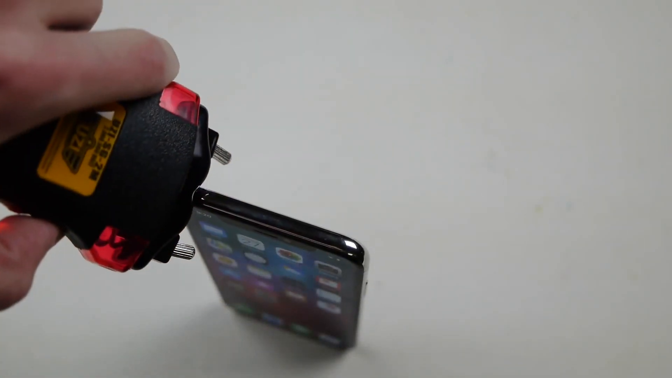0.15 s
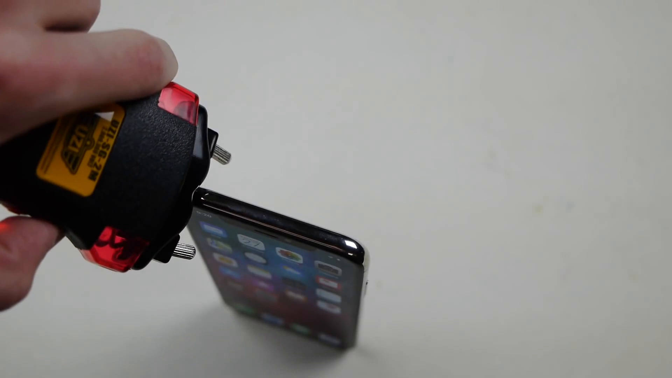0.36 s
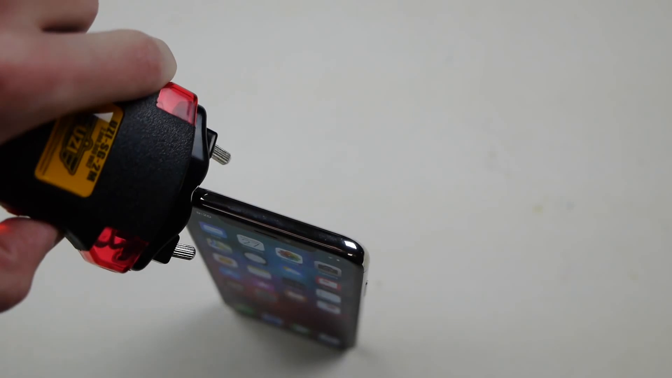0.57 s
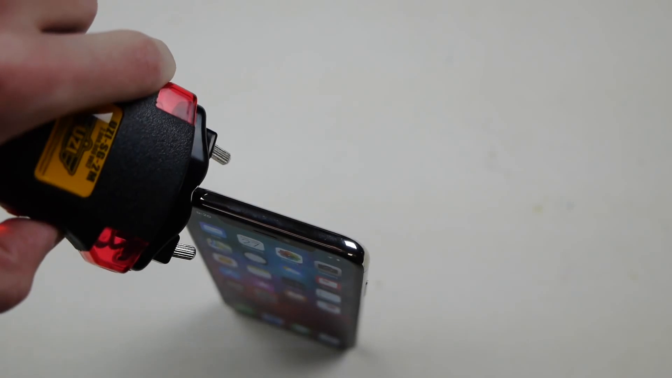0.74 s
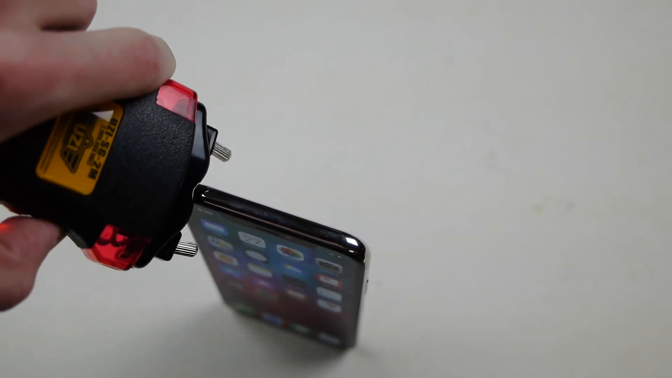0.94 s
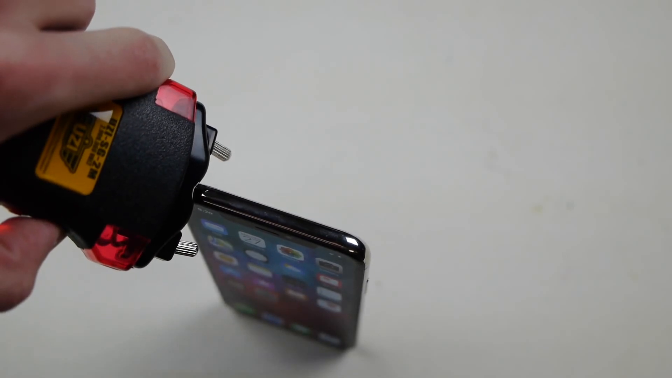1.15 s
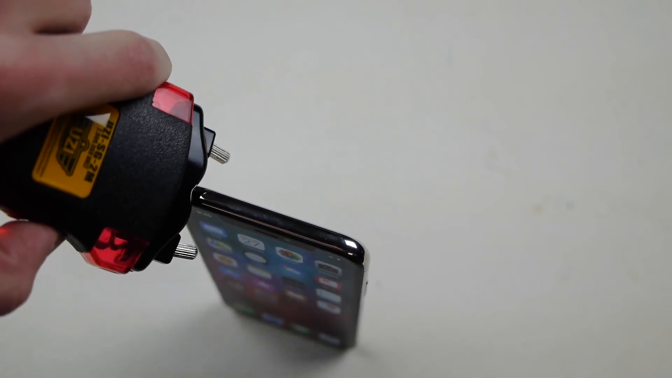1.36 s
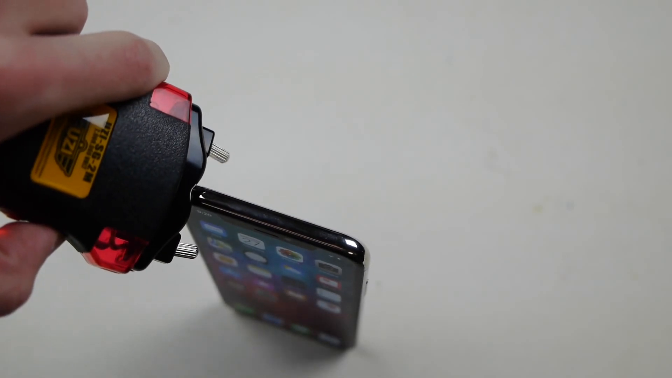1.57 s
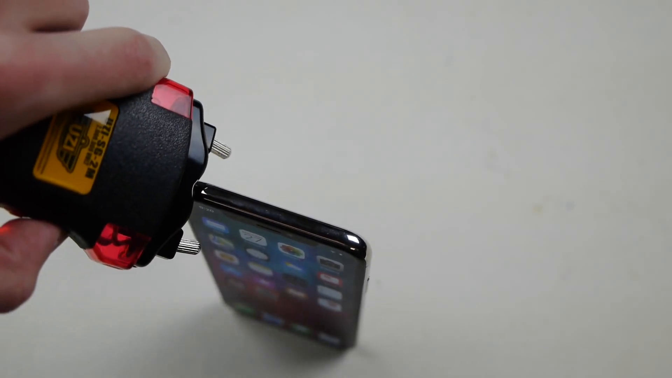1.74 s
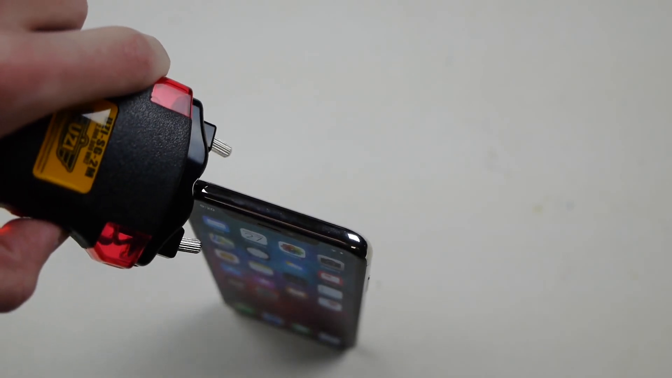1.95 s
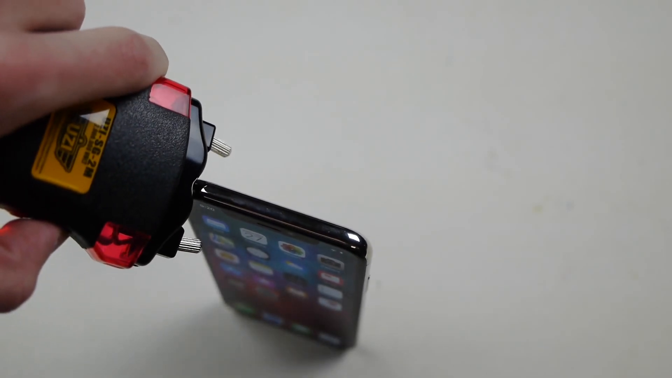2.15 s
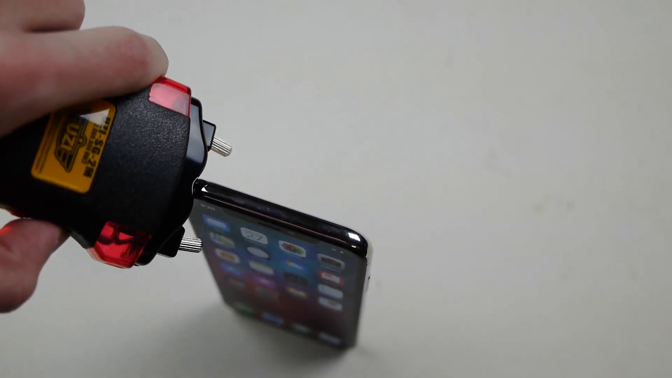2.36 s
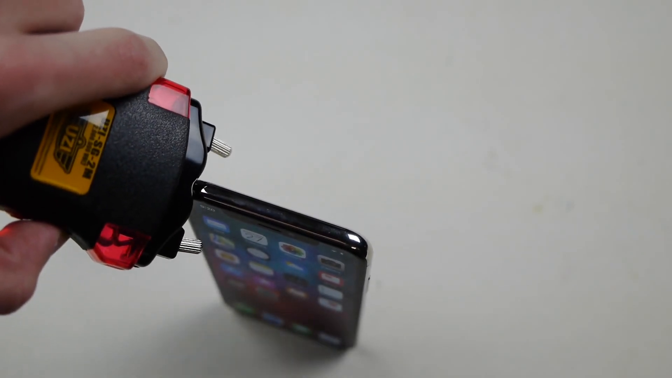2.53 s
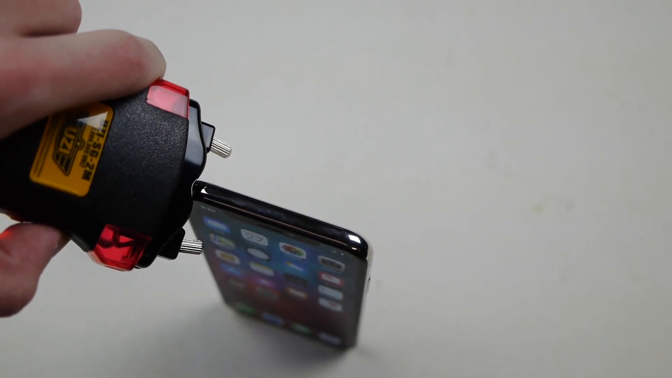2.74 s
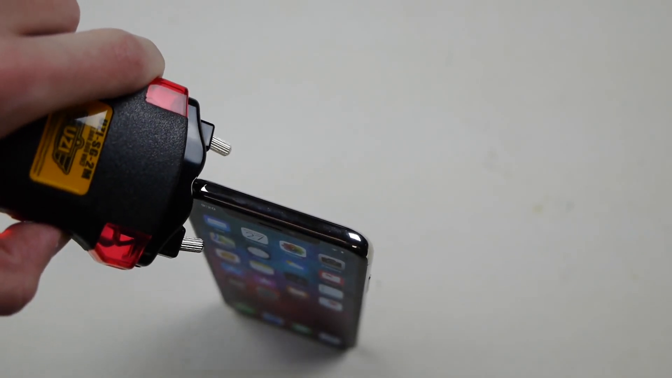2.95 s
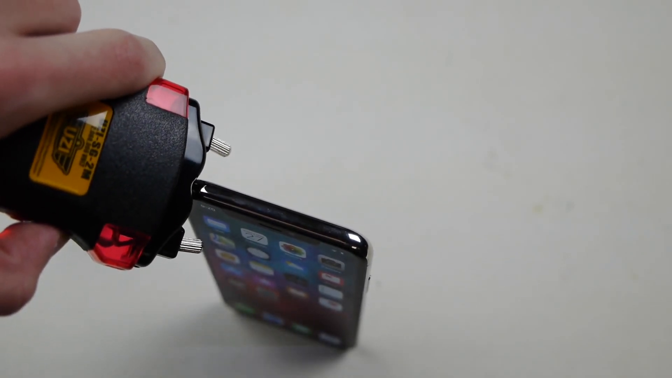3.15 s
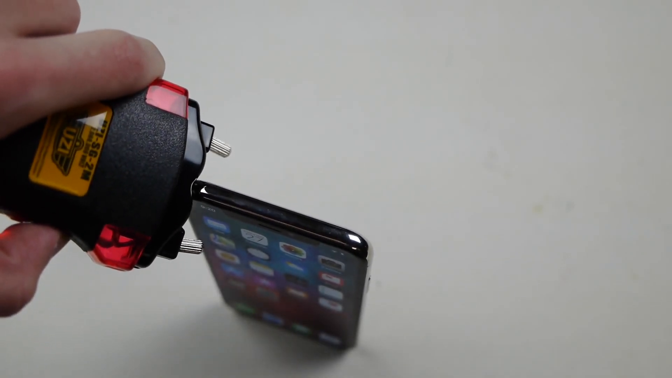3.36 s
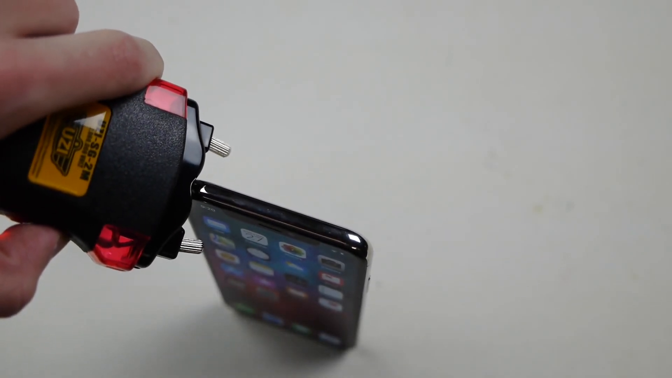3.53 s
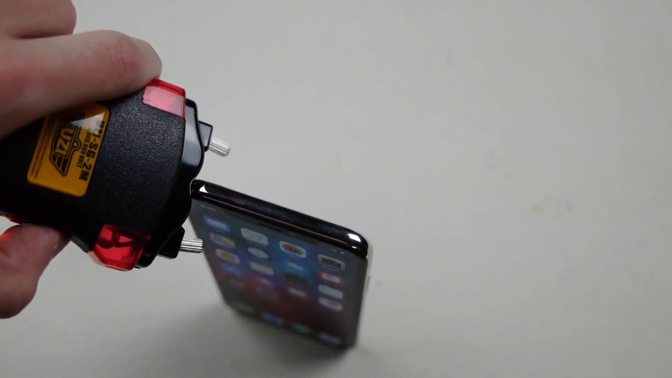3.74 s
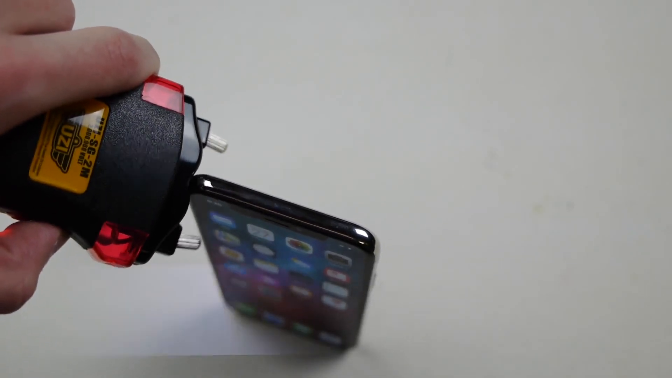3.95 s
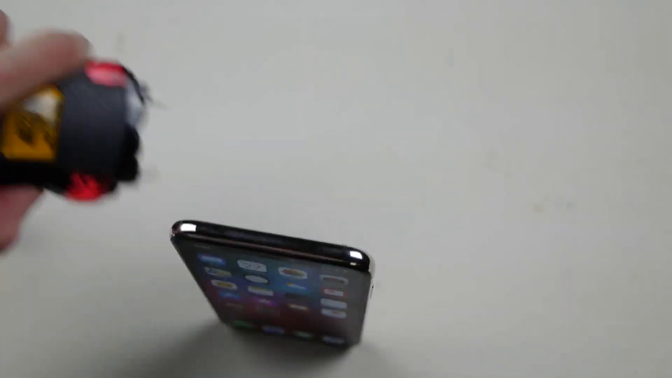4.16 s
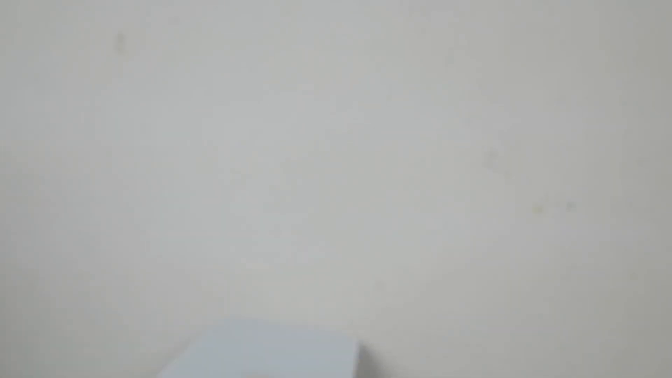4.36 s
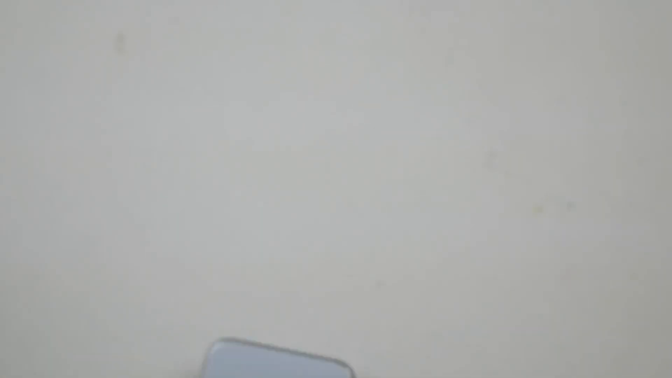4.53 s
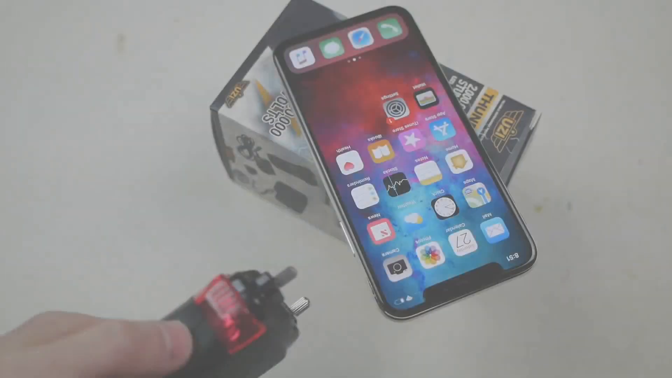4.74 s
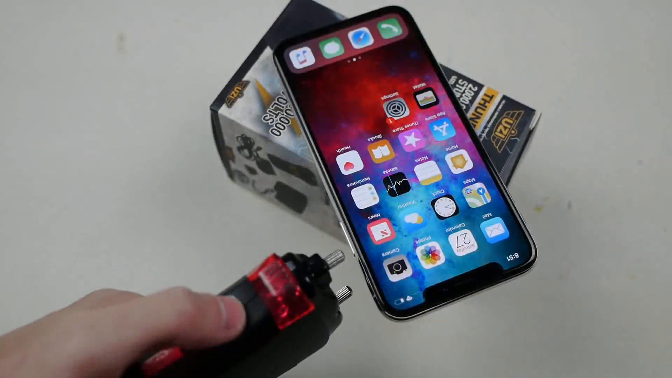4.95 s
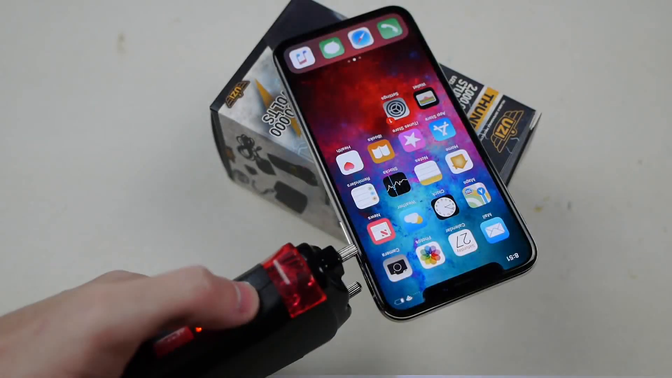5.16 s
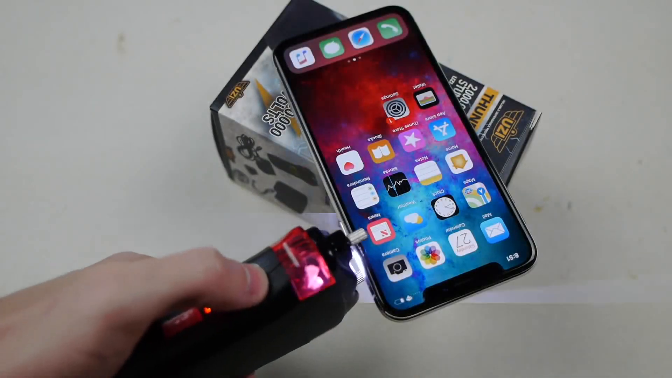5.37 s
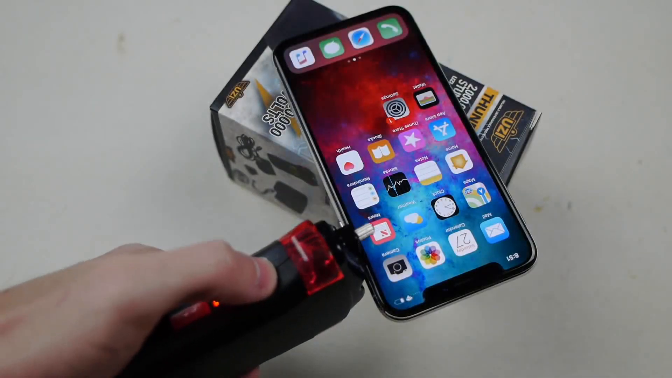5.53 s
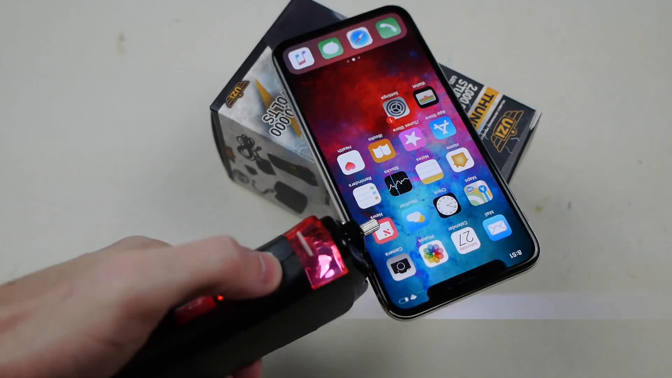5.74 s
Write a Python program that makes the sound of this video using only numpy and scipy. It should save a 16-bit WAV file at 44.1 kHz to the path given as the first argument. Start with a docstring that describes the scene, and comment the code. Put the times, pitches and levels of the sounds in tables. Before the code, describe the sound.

A stun gun crackles in a fast buzz, a phone topples onto a table, then slower, louder sparks follow.

```python
"""A stun gun sparks against a phone on a table, close to two microphones in a bare, bright room. Each spark is
one pressure spike as the gap breaks down; the short gap gives a fast, uneven buzz. The gun is drawn off, the
gap grows and the sparks come slower and harder; a hollow knock rings with the last of these, then the phone
slaps down and sets the table ringing. The trigger clicks and a slow, loud string of sparks follows. Quiet room
air lies behind it all, and the recorder softly clips the tallest spikes."""
import sys
import numpy as np
from scipy import signal
from scipy.fft import rfft, irfft
from scipy.io import wavfile
from scipy.ndimage import uniform_filter1d, map_coordinates

SR = 44100
rng = np.random.default_rng(int(sys.argv[2]) if len(sys.argv) > 2 else 0)


def persist_wave(psi):
    """Save psi, clipped to +-1, as 16-bit WAV."""
    counts = np.round(np.clip(psi, -1, 1) * 32767).astype(np.int16)
    wavfile.write(sys.argv[1], SR, np.atleast_2d(counts).T)


N = 255770

SIZE_EXPONENT = 0.84  # a slower pace means a wider gap: spark size goes with the mean wait to this power
FLUTTER_DB, FLICKER_DB = .45, .6  # depth of the buzz's wavering in strength and in brightness
CREEP_MS, CREEP_RATE = .018, 18  # the arc's foot creeps along the metal: path shift, moves a second
PATH_SPREAD_DB = .8  # spread of each path's strength from spark to spark
TOP_HZ = 15900  # the recorder's band limit

# Pace across the short gap. Each row: time in seconds, sparks per second.
BUZZ_PACE = [(0, 59), (.2, 68), (.3, 61), (.39, 66), (.5, 58.5), (.95, 60), (1.5, 56), (1.85, 58.5),
             (2.18, 58), (2.28, 71), (2.4, 60), (2.75, 56), (3.08, 60), (3.18, 54), (3.5, 56), (3.8, 52.5),
             (4.012, 53)]
# Sparks across a wide gap. Each row: start in seconds, crack and low pop levels in relative dB.
SLOW_SPARKS = [(4.0287, -1.5, -12), (4.0523, 2, -2.5), (4.0783, 1.5, 2), (4.1028, 2, 1.5), (4.13, 3.5, 10),
               (4.1551, 3, -5), (4.1837, 2.5, -16), (4.2078, 0.5, -16), (4.238, -1.5, 2), (5.211, 2, 15.5),
               (5.2385, -2, 6.5), (5.27, -3, 8), (5.2962, -1.5, -2.5), (5.3258, 1.5, 4.5),
               (5.3542, -0.5, 8.5), (5.382, -1.5, 6.5), (5.409, -3.5, -7), (5.439, -0.5, 9.5),
               (5.4676, 0.5, -2), (5.4976, -3, 6), (5.5251, 0, -20), (5.5546, -0.5, -20), (5.5869, 0, -19),
               (5.6217, 1, -20), (5.6557, -0.5, -18), (5.6902, 1.5, -26), (5.7224, -1.5, -29),
               (5.7485, -1, -25), (5.7821, -2, -31)]
# Spectra of the cracks and low pops. Each row: frequency in Hz, level in relative dB.
BUZZ_COLOUR = [(30, -21), (60, -16.5), (115, -11.5), (165, -12), (205, -13), (300, -14), (400, -10.4),
               (500, -11.5), (600, -14), (780, -11), (1130, -15.5), (1450, -18), (2100, -10.5),
               (2600, -14.5), (3000, -13.5), (3300, -14.5), (3600, -7.5), (4100, -9), (4450, -11),
               (4900, -7.5), (5500, -10), (7000, -7.5), (8200, -7), (9000, -5), (10300, -3), (11200, -4.5),
               (11850, -2), (12450, -2.5), (13400, 0.5), (14500, 1.2)]
WIDENING_COLOUR = [(40, -22), (400, -5), (1600, -10.5), (2500, -8), (4500, -4), (6500, -2), (10000, 0.5),
                   (13500, 2.5), (16000, 4.5)]
LONG_COLOUR = [(30, -61), (110, -48), (250, -16), (480, -5.5), (700, -5), (1100, -7.5), (1650, -13.5),
               (2200, -12.5), (2850, -4), (3500, -5), (4400, -6.3), (5800, -4), (7100, -1.5), (8000, -3),
               (9000, -1), (10500, -3), (13000, 0.7), (16000, -4)]
WIDENING_POP_COLOUR = [(25, -23), (75, -2.5), (140, 2.7), (250, 2.5), (450, 2.5), (750, -6.5), (1100, -16),
                       (1600, -22), (2700, -13), (4000, -34.5)]
LONG_POP_COLOUR = [(25, -23), (70, -4.5), (170, 0.5), (400, 0), (700, -8.5), (1500, -11.5), (2800, -11),
                   (4000, -31.5)]
# The gun's casing and prongs, ringing faintly. Each row: frequency in Hz, level in relative dB.
CASING_MODES = [(3720, -56), (4030, -54), (5026, -54), (8813, -50), (10126, -49), (10255, -49),
                (10487, -47), (11800, -47), (12909, -50), (13404, -50), (14104, -48), (14690, -48),
                (15224, -50)]
# Resonances around the prongs beside the phone. Each row: frequency in Hz, relative dB, t60 in seconds.
PRONG_MODES = [(2710, -4, 0.011), (2980, -6, 0.013), (7080, -0.5, 0.013), (8900, -5.5, 0.019)]
# Paths to the microphones, direct and off the table and nearby surfaces, with the phone upright and
# with the gun low. Small surfaces return only treble, soft ones only bass. Each row: delay in ms,
# lag at the right microphone in ms, gain in dB, low and high corners in Hz.
UPRIGHT_PATHS = [(0, .018, 1.3, 32, 14000), (.75, .02, -2, 2000, 16000), (2.52, .16, -3, 34, 1900),
                 (3.31, .34, -2, 3500, 17000), (3.66, -.33, -7, 5000, 18000), (6.05, .75, -8, 1200, 4000),
                 (8.5, .08, -10, 1500, 21000), (13.85, .2, -7, 1600, 19000)]
LOW_PATHS = [(0, 0, -.5, 1800, 12000), (.47, .015, 8.2, 150, 10000), (1.02, -.25, 1, 2500, 16000),
             (2.77, .2, -2, 2500, 18000), (3.16, .1, 0, 3000, 18000), (5.3, .1, -6, 2000, 18000),
             (13.4, .2, -8, 1600, 19000)]

# A hollow knock that rings with the last spark of the widening arc, and the table under it. Each row: frequency
# in Hz, level in relative dB, t60 in seconds.
KNOCK_MODES = [(319, -14, 0.068), (428, -18, 0.1), (704, 2, 0.039), (746, -9, 0.058)]
TABLE_MODES = [(118, 4.5, 0.19), (214, -7, 0.093), (332, -4, .12), (460, 1, .13), (538, -3, .15),
               (610, -12, .14)]
# The phone falls flat and settles. Each row: start in seconds, slap and table ring in relative dB.
LANDINGS = [(4.5986, -29, -37), (4.623, -47, -41), (4.691, -50, -45.5), (4.853, -90, -66)]
# Thuds as its far end comes down and as it comes to rest.
# Each row: start in seconds, level in dB, frequency in Hz, t60 in seconds.
THUDS = [(4.6225, -11, 170, .03), (4.855, -32, 150, .07)]
# Clicks of the grip and trigger. Each row: start in seconds, level in relative dB.
CLICKS = [(4.94, -58), (5.1865, -34.5)]
# Spectra of the phone's slap, its dull rattle and the clicks. Each row: frequency in Hz, relative dB.
SLAP_COLOUR = [(30, -22), (90, -10), (250, 3), (370, -3.5), (520, 5.5), (700, -2), (900, -3.5), (1800, -6),
               (4000, -12), (7000, -16.5), (10000, -24.5), (15000, -38)]
RATTLE_COLOUR = [(40, -42.5), (120, -1), (200, -4), (330, -5.5), (450, 2), (620, -7), (900, -9),
                 (3000, -46)]
CLICK_COLOUR = [(100, -19), (750, 14), (1500, -2), (4500, 0.5), (8000, -8), (15000, -18)]

# The bare room's decay. Each row: frequency in Hz, t60 in seconds.
ROOM_T60 = [(150, 0.04), (500, 0.38), (2500, 0.6), (5500, 0.48), (8000, 0.45), (11000, 0.36), (16000, 0.32)]
# Spectra of its reverberation and its air. Each row: frequency in Hz, level in relative dB.
ROOM_COLOUR = [(100, -6), (400, -16.5), (1200, -9), (2200, -3.5), (3600, -1.5), (7000, 1), (11000, -1),
               (15000, -7)]
AIR_COLOUR = [(15, -58), (25, -36.5), (114, -11.5), (451, -14.5), (516, -14), (796, -25.5), (1040, -22),
              (1130, -25), (11600, -34), (16000, -45.5)]
# The air sinks and comes back up. Each row: time in seconds, level in relative dB.
AIR_LEVEL = [(0, -60), (4.3, -71.5), (4.82, -79), (4.92, -67.5), (5.8, -56)]
# A faint background hum. Each row: frequency in Hz, level in dB.
HUM_TONES = [(113, -70), (317.6, -72), (522.2, -70), (1044, -79)]


def buzz(level_db=-3.0, jitter=.16):
    """Small, fast sparks across the short gap waver in strength and brightness; the casing rings along."""
    times, sizes = firing(BUZZ_PACE, jitter)
    sizes = sizes * amp(level_db)
    casing = sum(amp(db + 25) * ringing(hz, t60=.06) for hz, db in CASING_MODES)
    cracks = sparks(times, sizes, BUZZ_COLOUR, UPRIGHT_PATHS,
                    scatter_db=3.0, scatter_t60=0.026, room_db=6.0, wander=0.68)
    treble = band(cracks, low_hz=6000, high_hz=20000)
    flutter = amp(FLUTTER_DB * wobble(rate=13))
    flicker = amp(FLICKER_DB * wobble(rate=18)) - 1
    return flutter * (cracks + flicker * treble) + convolve(impulses(times, sizes), casing)


def widening_arc(level_db=2.5):
    """The gun is drawn away: fewer, harder sparks, weaker at the end as the arc stretches and breaks."""
    times, crack_db, pop_db = slow_sparks(start_s=4, stop_s=5)
    cracks = sparks(times, amp(level_db + crack_db), WIDENING_COLOUR, UPRIGHT_PATHS,
                    scatter_db=2.0, scatter_t60=0.02, room_db=7, wander=0.69)
    lows = pops(times, pop_db, WIDENING_POP_COLOUR,
                room_db=-5, rumble_db=-7.5, rumble_t60=0.1, rumble_hz=450)
    return cracks + lows


def long_arc(level_db=3.0):
    """A slow, loud string of sparks close to the table; the first is the hardest."""
    times, crack_db, pop_db = slow_sparks(start_s=5, stop_s=6)
    sizes = amp(level_db + crack_db)
    cracks = sparks(times, sizes, LONG_COLOUR, LOW_PATHS,
                    scatter_db=6.0, scatter_t60=0.014, room_db=8.5, wander=0.78)
    prongs = sum(amp(db) * ringing(hz, t60) for hz, db, t60 in PRONG_MODES)
    ring = band(convolve(impulses(times, sizes), prongs), low_hz=800, high_hz=20000)
    lows = pops(times, pop_db, LONG_POP_COLOUR,
                room_db=-9, rumble_db=-9.5, rumble_t60=0.093, rumble_hz=302)
    return cracks + ring + lows


def firing(pace, jitter):
    """Spark times and sizes: the capacitor charges until breakdown; a longer wait stores more energy."""
    knots, rate = np.transpose(pace)
    t = np.arange(knots[0], knots[-1], 1 / SR)
    charge = np.cumsum(np.interp(t, knots, rate)) / SR
    waits = 1 + jitter * rng.uniform(-1, 1, int(charge[-1]) + 1)
    due = np.cumsum(waits)
    due -= uniform_filter1d(due - np.arange(len(due)), size=9)  # the mean pace follows the charging rate
    times = np.interp(due, charge, t)
    rates = np.interp(times, knots, rate)
    return times, np.sqrt(waits) * (rates.mean() / rates) ** SIZE_EXPONENT


def slow_sparks(start_s, stop_s):
    """Times, crack levels and pop levels of the wide-gap sparks in one stretch."""
    return np.transpose([row for row in SLOW_SPARKS if start_s < row[0] < stop_s])


def sparks(times, sizes, colour, paths, scatter_db, scatter_t60, room_db, wander, routes=4):
    """Each pressure spike reaches the microphones directly, off nearby surfaces and from the room."""
    near = np.zeros((2, N))
    onsets = np.clip(times * SR, 0, N - 1).astype(int)
    for delay_ms, lag_ms, db, low_hz, high_hz in paths:
        path_ms = delay_ms + CREEP_MS * wobble(CREEP_RATE)[onsets]
        strength = sizes * amp(db + PATH_SPREAD_DB * rng.standard_normal(len(times)))
        arrivals = [impulses(times + ms / 1000, strength) for ms in (path_ms, path_ms + lag_ms)]
        near -= band(arrivals, low_hz, high_hz)
    # the gun, hand and phone scatter the upper part of the spike
    near += amp(scatter_db) * band(bursts(times, sizes, scatter_t60), low_hz=1470, high_hz=19102)
    # the arc takes one of several routes; wander is the share of the room's answer unique to each
    route = rng.integers(routes, size=len(times))
    common = room_tail()
    tails = [np.sqrt(1 - wander) * common + np.sqrt(wander) * room_tail() for _ in range(routes)]
    far = sum(convolve(impulses(times, sizes * (route == k)), tail) for k, tail in enumerate(tails))
    return convolve(near + amp(room_db) * far, pulse(colour))


def pops(times, db, colour, room_db, rumble_db, rumble_t60, rumble_hz, width=.5):
    """At close range, slow sparks also give the microphones one low push and a short rumble."""
    push = convolve(-impulses(times + 0.000427, amp(db)), pulse(colour))
    puffs = band(bursts(times, amp(db), rumble_t60), low_hz=70, high_hz=rumble_hz)
    mid, side = convolve(puffs, pulse(colour))
    rumble = np.array([mid + width * side, mid - width * side])
    return push + amp(rumble_db) * rumble + amp(room_db) * convolve(push, room_tail())


def hollow_knock(start_s=4.2385, knock_db=-6):
    """A hollow knock rings out once with the last spark of the widening arc."""
    modes = sum(amp(db) * ringing(hz, t60) for hz, db, t60 in KNOCK_MODES)
    return convolve(impulses([start_s], [amp(knock_db)]), modes)


def falling_phone(room_db=-4.5, face_db=-8, rattle_db=28, lowest_hz=75):
    """The phone slaps down with a short note from its flat face, thuds, bounces and rings the table."""
    times, slap_db, ring_db = np.transpose(LANDINGS)
    t = np.arange(SR // 2) / SR
    table = sum(amp(db - 60 * t / t60) * np.sin(2 * np.pi * hz * t) for hz, db, t60 in TABLE_MODES)
    attack = 1 - np.exp(-t / 0.0058)
    ring = convolve(impulses(times, amp(ring_db)), table * attack)
    sizes = amp(slap_db + 28)
    blows = impulses(times, sizes)
    slap = bursts(times, sizes, t60=0.041)[0] + amp(room_db) * convolve(blows, room_tail())
    face = convolve(blows, amp(face_db) * ringing(hz=490, t60=0.053))
    thuds = sum(convolve(impulses([at], [amp(db)]), ringing(hz, t60)) for at, db, hz, t60 in THUDS)
    rattle = convolve(bursts(times, amp(ring_db + rattle_db), t60=0.37)[0], pulse(RATTLE_COLOUR))
    fall = ring + face + thuds + rattle + convolve(slap, pulse(SLAP_COLOUR))
    return signal.lfilter(*signal.butter(2, lowest_hz, "highpass", fs=SR), fall)


def trigger(room_db=-2.0):
    """Plastic clicks as the gun is gripped and switched on."""
    times, db = np.transpose(CLICKS)
    click = convolve(bursts(times, amp(db + 21.0), t60=0.018), pulse(CLICK_COLOUR))
    return click + amp(room_db) * convolve(click, room_tail())


def room_tail(build_up_s=0.0049, early_life_s=0.039):
    """The bare room's diffuse stereo answer: early echoes are strongest and the upper mids last longest."""
    hz, t, noise = signal.stft(rng.standard_normal((2, SR * 3 // 4)), SR, nperseg=256)
    t60 = along(ROOM_T60, hz)[:, None]
    fade = amp(-60 * t / t60) * np.sqrt(2 * np.log(1000) / (t60 * SR))  # equal energy for any t60
    colour = amp(along(ROOM_COLOUR, hz))[:, None]
    tail = signal.istft(noise * fade * colour, SR, nperseg=256)[1]
    age = np.arange(tail.shape[1]) / SR
    return tail * (1 - np.exp(-age / build_up_s)) * (1 + np.exp(-age / early_life_s))


def room_air():
    """Quiet air, mostly alike at both microphones; a faint hum comes up before the last string of sparks."""
    t = np.arange(N) / SR
    air_db = np.interp(t, *np.transpose(AIR_LEVEL))
    air = convolve(rng.standard_normal(N) + .5 * rng.standard_normal((2, N)), pulse(AIR_COLOUR))
    hum = sum(np.sqrt(2) * amp(db) * np.sin(2 * np.pi * hz * t) for hz, db in HUM_TONES)
    return amp(air_db) * air + np.interp(t, [4.8, 4.92], [0, 1]) * hum


def pulse(colour, size=4096):
    """The sharpest causal pulse with this spectrum, scaled to unit power gain below the band limit."""
    hz = np.fft.rfftfreq(size, 1 / SR)
    gain = amp(along(colour, hz))
    gain /= np.sqrt(np.mean(gain ** 2 * (hz < TOP_HZ)))
    cepstrum = irfft(np.log(gain))
    cepstrum[1:size // 2] *= 2  # fold onto positive time for minimum phase
    cepstrum[size // 2 + 1:] = 0
    return irfft(np.exp(rfft(cepstrum)))[:size // 2]


def impulses(times, sizes, order=8):
    """Impulses placed between samples with a windowed sinc."""
    at = np.asarray(times)[:, None] * SR
    index = np.floor(at).astype(int) + np.arange(1 - order, order + 1)
    taps = np.sinc(index - at) * np.sinc((index - at) / order) * np.asarray(sizes)[:, None]
    return np.bincount(np.clip(index, 0, N).ravel(), taps.ravel(), N + 1)[:N]


def bursts(times, sizes, t60):
    """A short stereo puff of fresh noise at each time, as strong as an impulse of that size."""
    fade = amp(-60 * np.arange(SR // 4) / SR / t60) ** 2
    onsets = np.clip(np.round(times * SR).astype(int), 0, N)
    energy = np.bincount(onsets, sizes ** 2, N + 1)[:N]
    envelope = np.sqrt(np.abs(convolve(energy, fade / fade.sum())))
    return envelope * rng.standard_normal((2, N))


def ringing(hz, t60):
    """A struck resonance of energy 1."""
    t = np.arange(SR // 2) / SR
    mode = amp(-60 * t / t60) * np.sin(2 * np.pi * hz * t)
    return mode / np.linalg.norm(mode)


def wobble(rate):
    """A smooth random curve, rate knots a second."""
    knots = rng.standard_normal(int(N * rate / SR) + 4)
    return map_coordinates(knots, [np.arange(N) * rate / SR])


def band(x, low_hz, high_hz):
    """Gentle roll-off below and above two corners."""
    low_cut = signal.lfilter(*signal.butter(1, low_hz, "highpass", fs=SR), x)
    return signal.lfilter(*signal.butter(1, high_hz, fs=SR), low_cut)


def convolve(x, response):
    """Every channel of x through a response."""
    return signal.fftconvolve(np.atleast_2d(x), np.atleast_2d(response), axes=1)[:, :N]


def along(points, hz):
    """Interpolate (Hz, value) points on a log frequency axis."""
    knots_hz, values = np.transpose(points)
    return np.interp(np.log(hz + 1), np.log(knots_hz + 1), values)


def amp(db):
    """Decibels to gain."""
    return 10 ** (np.asarray(db) / 20)


def scene():
    """The table from the two close microphones, with the gun slightly to the left."""
    arcs = (buzz() + widening_arc() + long_arc()) * amp([[.2], [-.2]])
    return arcs + hollow_knock() + falling_phone() + trigger() + room_air()


def record(dry, ceiling=0.5, order=4):
    """The recorder rounds off the tallest spikes, sheds the deepest bass and cuts off at its band limit."""
    clipped = dry / (1 + np.abs(dry / ceiling) ** order) ** (1 / order)
    trimmed = band(clipped, low_hz=25, high_hz=21000)
    band_limit = signal.firwin(301, TOP_HZ, window="blackman", fs=SR)
    return signal.fftconvolve(trimmed, band_limit[None], "same", axes=1)


dry = scene()
out = record(dry)
persist_wave(out)
```